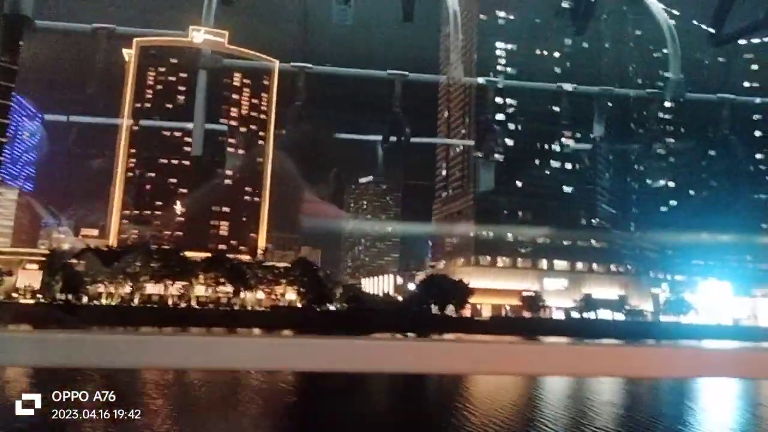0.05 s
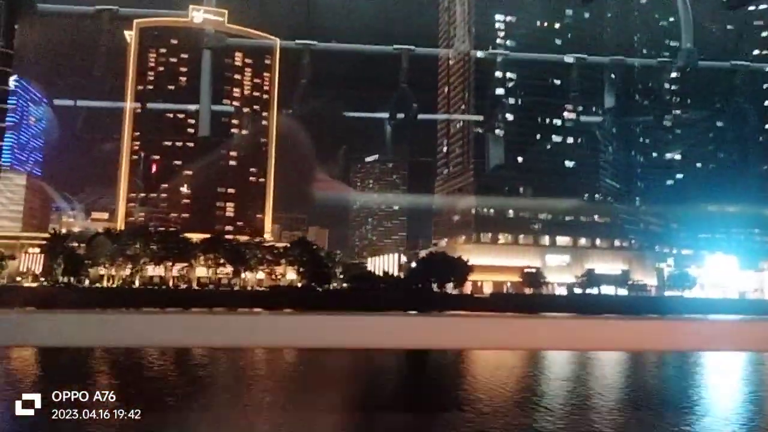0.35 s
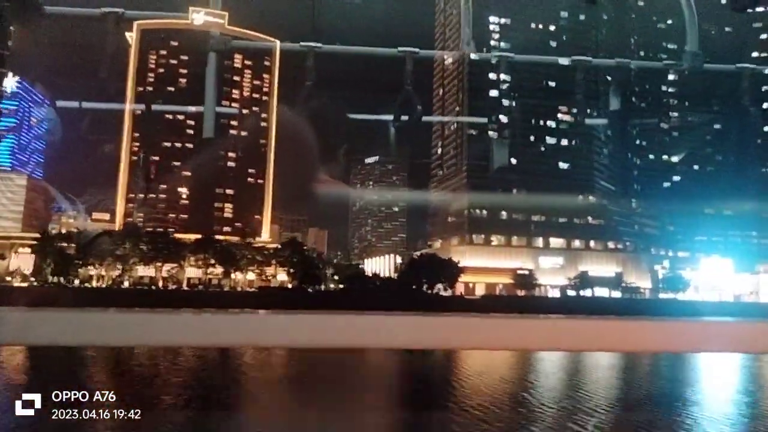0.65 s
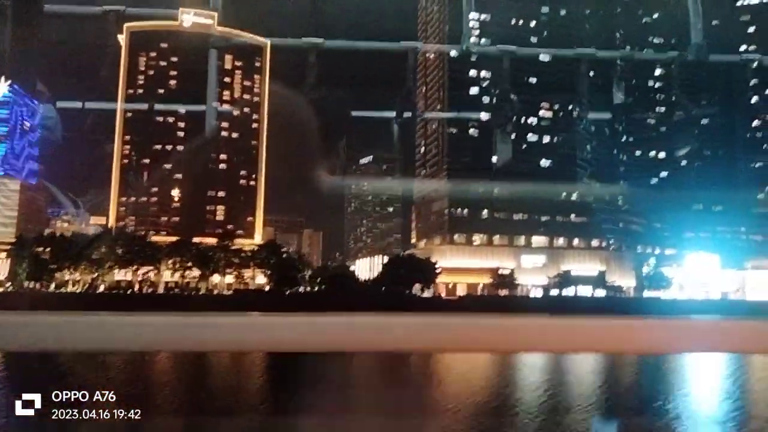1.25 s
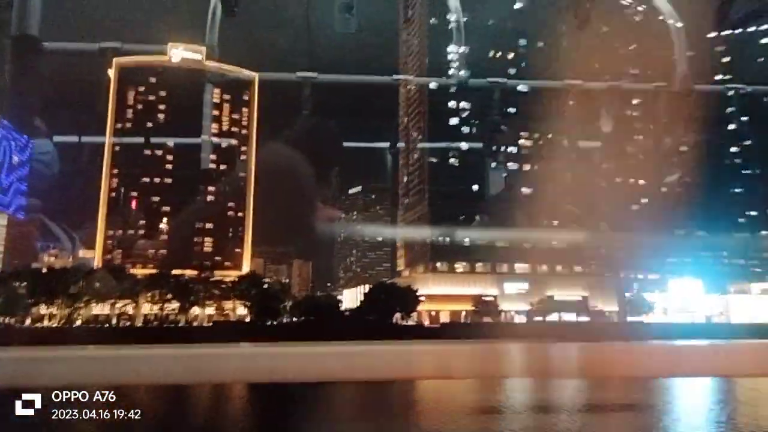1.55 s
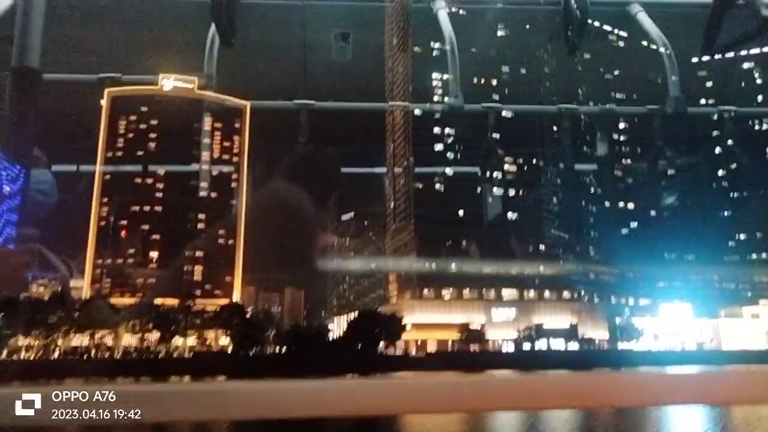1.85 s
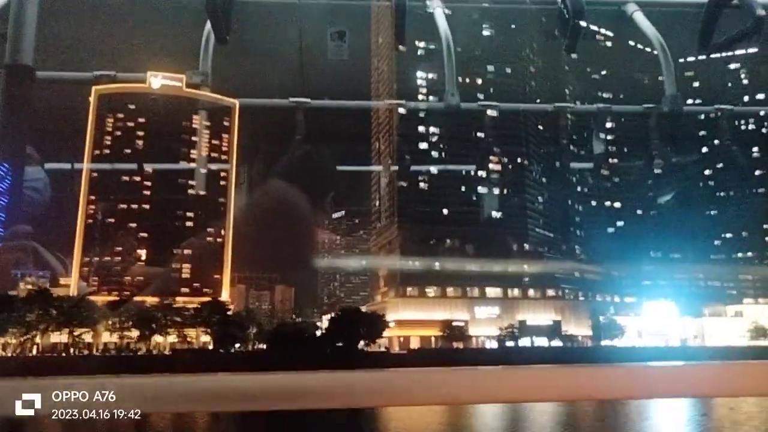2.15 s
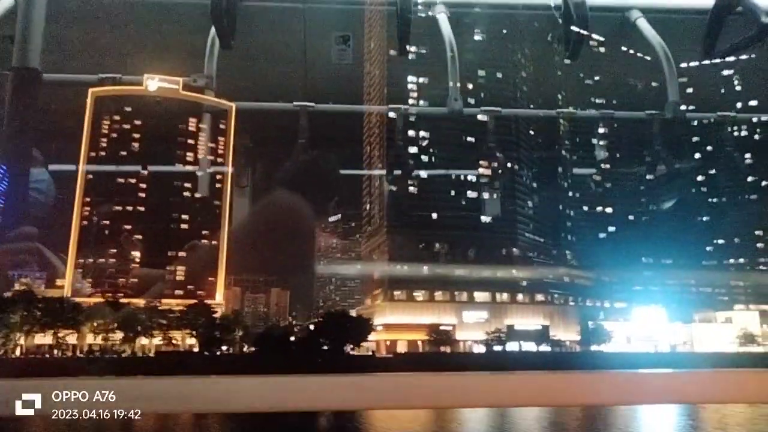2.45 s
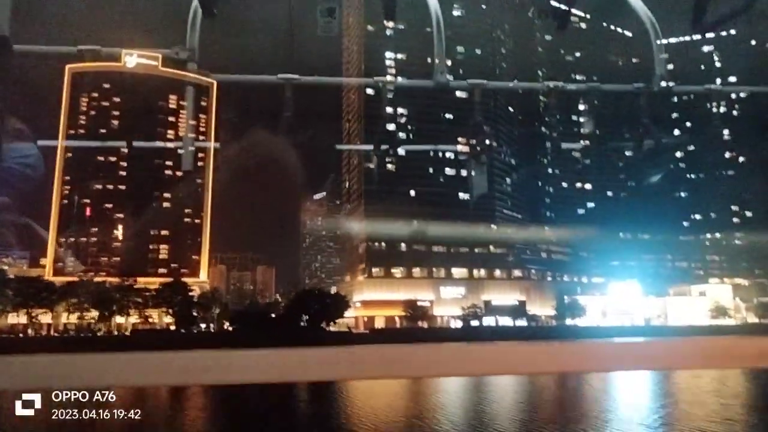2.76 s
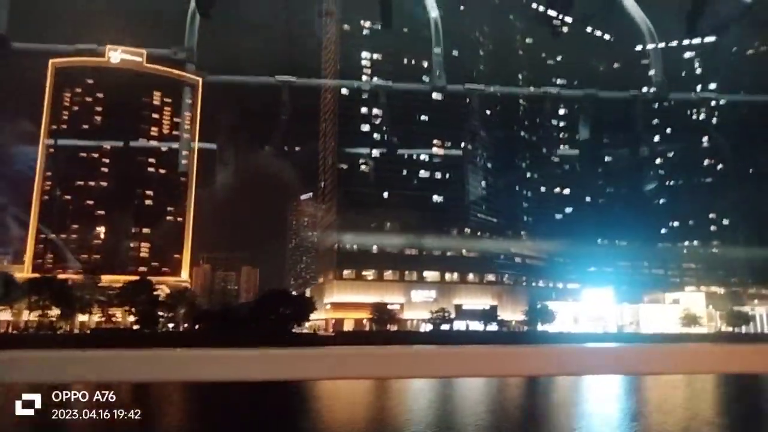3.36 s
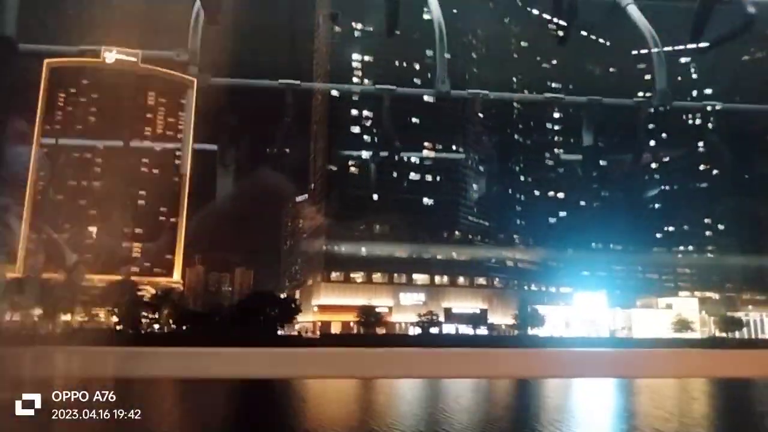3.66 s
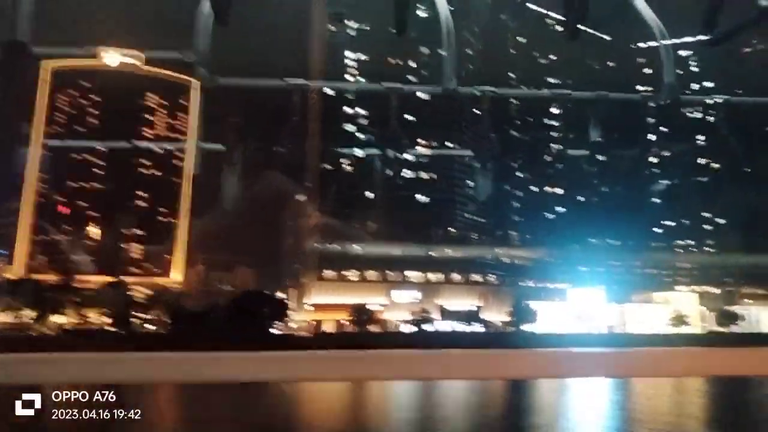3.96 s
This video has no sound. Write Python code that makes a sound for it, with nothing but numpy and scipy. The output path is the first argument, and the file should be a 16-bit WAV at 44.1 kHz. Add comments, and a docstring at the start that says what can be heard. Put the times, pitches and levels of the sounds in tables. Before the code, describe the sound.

Inside a moving bus, the engine hums low and steady over road noise, a thin whine and faint nearby rustling. A short air brake blast cuts in, the engine eases, and near the end the body booms and creaks.

```python
"""A six-cylinder diesel drones inside a moving bus, with a gear whine over the road rumble.
Drone and whine are multiples of the crankshaft's rate and soften as the driver lifts off the throttle.
An air brake valve blows off once, a turbulent jet through a resonant pipe, and goes on leaking faintly.
Something rustles softly nearby and loose fittings rattle. Near the end a bump makes the body boom
at its low resonance, and a panel creaks as the body flexes back."""
import sys
import numpy as np
from scipy.fft import rfft, irfft, next_fast_len
from scipy.io import wavfile
from scipy.ndimage import map_coordinates

SR = 44100
rng = np.random.default_rng(int(sys.argv[2]) if len(sys.argv) > 2 else 0)


def dump(signal):
    """Clip the signal to [-1, 1] and save it as 16-bit WAV at the path in sys.argv[1]."""
    limited = np.clip(np.atleast_2d(signal).T, -1, 1)
    pcm = np.round(limited * 32767).astype(np.int16)
    wavfile.write(sys.argv[1], SR, pcm)


N = 176400


def amp(db):
    """Amplitude ratio of a level in decibels."""
    return 10 ** (np.asarray(db) / 20)


def unit(x):
    """Normalisation to rms 1."""
    return x / np.sqrt(np.mean(x ** 2) + 1e-20)


def clock():
    """Time of every sample, in seconds."""
    return np.arange(N) / SR


def along(points, hz):
    """Interpolation of (frequency_hz, value) points on a logarithmic axis."""
    frequencies, values = np.transpose(points)
    return np.interp(np.log(hz + 1), np.log(frequencies + 1), values)


def curve(rows):
    """Linear interpolation of (time_s, value) points at every sample."""
    return np.interp(clock(), *np.transpose(rows))


def wobble(rate_hz):
    """Smooth random modulation: a spline through rate_hz Gaussian values a second."""
    return map_coordinates(rng.standard_normal(4000), [clock() * rate_hz + 2], mode="wrap")


def filtered(x, response):
    """Linear filtering: the spectrum is multiplied by a frequency response."""
    size = next_fast_len(N + 8192)
    return irfft(rfft(x, size) * response(np.fft.rfftfreq(size, 1 / SR)), size)[..., :N]


def lowpass(x, cutoff_hz, slope):
    """Low-pass filtering: above the cutoff, gain falls as frequency to the power -slope."""
    return filtered(x, lambda hz: 1 / (1 + (hz / cutoff_hz) ** slope))


def pan(db):
    """Stereo gains for a level difference, left minus right."""
    return amp(np.array([[db], [-db]]) / 2)


def swell(peak_s, rise_s, fall_s):
    """Envelope with a Gaussian rise to 1 and an exponential decay."""
    t = clock() - peak_s
    return np.exp(-np.where(t < 0, (t / rise_s) ** 2, t / fall_s))


# Left-right likeness of the cabin sound: frequency_hz, correlation
CABIN_CORRELATION = [(60, .98), (120, 0.99), (240, .9), (400, 0.64), (700, 0.55), (1000, -0.021),
                     (1450, -0.61), (1850, 0.15), (3500, -0.091), (15000, 0.036)]

def stereo_angle(hz):
    """Half the phase difference whose cosine is the left-right correlation."""
    return np.arccos(np.clip(along(CABIN_CORRELATION, hz), -1, 1)) / 2


def tone(phase, hz):
    """A stereo sine of rms 1 that reaches the two microphones out of phase."""
    offset = stereo_angle(hz)
    return np.sqrt(2) * np.sin(phase + rng.uniform(0, 2 * np.pi) + np.array([[offset], [-offset]]))


def noise(gain):
    """A partly coherent noise field of rms 1: alike in the bass, unrelated in the high treble."""
    weights = lambda hz: np.array([np.cos(stereo_angle(hz)), np.sin(stereo_angle(hz))])
    mid, side = filtered(rng.standard_normal((2, N)), lambda hz: gain(hz) * weights(hz))
    return unit(np.array([mid + side, mid - side]))


def shaped(spectrum):
    """Spectral shaping of cabin noise by (frequency_hz, relative_db) points."""
    return noise(lambda hz: amp(along(spectrum, hz)))


# Crankshaft speed: time_s, speed_hz
CRANK_SPEED = [(0, 20.11), (0.5, 20.43), (1, 20.58), (1.5, 20.77), (2, 21.04), (2.4, 21.14), (2.8, 20.95),
               (3.3, 20.79), (4, 20.53)]
# Throttle, 0 to 1: time_s, load_fraction
THROTTLE = [(0, 0.98), (.7, 1), (2.55, 0.93), (2.8, 0.44), (3.7, 0.3), (3.9, 0.6)]
# Strong engine orders: cycles_per_two_turns
STRONG_HARMONICS = [5, 6, 10, 12, 15, 19, 20, 22]
# Their levels, row for row: loaded_db, coasting_db
STRONG_LEVELS = [(-27.5, -23.5), (-17.5, -31.5), (-19.5, -18.5), (-27, -33.5), (-33.5, -31.5),
                 (-23.5, -35.5), (-28.5, -29), (-33, -33)]
# Envelope of the weaker orders at full load: frequency_hz, level_db
WEAK_LEVELS = [(30, -42), (45, -43), (80, -28.5), (115, -48.5), (160, -36), (230, -38.5), (330, -42),
               (450, -48), (900, -59)]
# Extra gain of the fifth order, the body drone near 104 Hz: time_s, gain_db
DRONE_GAIN = [(0, 4.5), (.3, -14), (.65, 0.5), (4, 0.5)]
DRONE_HARMONIC, WEAK_COAST_DB = 10, -3
WAVER_DB, WAVER_FROM_HZ = 0.99, 91  # higher orders waver more as the panels shake

def engine(crank_phase, mean_crank_hz):
    """Harmonic series: the firing cycle repeats every two turns, so its partials are half orders."""
    load = curve(THROTTLE)
    strong = dict(zip(STRONG_HARMONICS, STRONG_LEVELS))
    drone = 0
    for harmonic in range(3, 46):
        hz = harmonic / 2 * mean_crank_hz
        if harmonic in strong:
            loaded_db, coasting_db = strong[harmonic]
            waver_db = WAVER_DB * max(1, hz / WAVER_FROM_HZ) * wobble(6.975)
            db = coasting_db + load * (loaded_db - coasting_db) + waver_db
        else:
            db = along(WEAK_LEVELS, hz) + WEAK_COAST_DB * (1 - load) + 3 * wobble(5.04)
        if harmonic == DRONE_HARMONIC:
            db = db + curve(DRONE_GAIN)
        drone = drone + amp(db) * tone(harmonic / 2 * crank_phase, hz)
    return drone


# Pure tone of the gear mesh: time_s, level_db
MESH_LEVEL = [(0, -29.5), (.5, -28.5), (1.1, -30.5), (1.45, -33.5), (1.7, -30.5), (2.1, -36), (2.55, -37),
              (2.8, -38), (3.4, -40), (4, -38)]
MESHES_PER_TURN, SIDEBAND_DB = 31.25, -41.5
SKIRT_DB, SKIRT_COAST_DB, SKIRT_HALF_WIDTH_HZ = -35, 3, 28

def gear_whine(crank_phase, mean_crank_hz):
    """Gear meshing: a tone at the tooth rate, a modulation skirt and a sideband one firing rate below."""
    phase, hz = MESHES_PER_TURN * crank_phase, MESHES_PER_TURN * mean_crank_hz
    line = amp(curve(MESH_LEVEL) + 0.77 * wobble(6.47)) * tone(phase, hz)
    skirt = sum(wobble(SKIRT_HALF_WIDTH_HZ * 2) * tone(phase, hz) for _ in range(4)) / 2
    skirt_db = SKIRT_DB + SKIRT_COAST_DB * (0.5 - curve(THROTTLE))
    sideband = wobble(12) * tone(phase - 3 * crank_phase, hz)  # three firings a turn
    return pan(db=-3.5) * (line + amp(skirt_db) * skirt + amp(SIDEBAND_DB) * sideband)


# Road and cabin noise: frequency_hz, relative_db
ROAD_SPECTRUM = [(10, -30), (18, -20.5), (26, 1), (42, -8.5), (78, -3), (112, -9.5), (160, -9.5),
                 (185, -11), (225, -8.5), (280, -21), (500, -21), (700, -21), (830, -20.5), (1050, -27),
                 (1400, -28.5), (1600, -34.5), (2000, -36.5), (2800, -40.5), (4000, -48), (5000, -52),
                 (6000, -56.5), (9000, -61.5), (15500, -67.5)]
ROAD_DB, RUMBLE_WAVER_DB, CLATTER_DEPTH = -20.5, 1.7, 0.052

def road_rumble(crank_phase):
    """Broadband tyre and body noise; its upper band is amplitude-modulated twice per crank turn."""
    rush = shaped(ROAD_SPECTRUM)
    low = lowpass(rush, cutoff_hz=450, slope=4)
    clatter = 1 + CLATTER_DEPTH * np.sin(2 * crank_phase + wobble(8.22))
    rumble = low * amp(RUMBLE_WAVER_DB * wobble(1.7))
    hiss = (rush - low) * clatter * amp(0.9 * wobble(12))
    return amp(ROAD_DB) * (rumble + hiss)


# Soft swishes close by: peak_s, level_db
RUSTLE_STROKES = [(.03, -49), (.24, -49), (.34, -50), (.39, -50.5), (.445, -46.5), (.492, -43.5),
                  (.535, -51.5), (0.714, -54), (.888, -51), (1.22, -53), (1.565, -52), (1.62, -47),
                  (1.68, -63), (1.8, -53), (1.88, -47.5), (2.95, -48), (3.62, -50), (3.68, -48.5),
                  (3.905, -48), (3.99, -40)]
# Their noise: frequency_hz, relative_db
RUSTLE_SPECTRUM = [(1500, -17), (3500, 6.5), (7000, -2.5), (9500, -5.5), (12500, -2.5), (15500, -7)]
GRAIN_DB = 2

def rustles():
    """Incoherent addition: strokes of grainy noise sum in power."""
    power = sum((amp(db) * swell(peak_s, rise_s=0.0065, fall_s=0.042)) ** 2
                for peak_s, db in RUSTLE_STROKES)
    grain = amp(GRAIN_DB * wobble(600))
    return np.sqrt(power) * unit(grain * shaped(RUSTLE_SPECTRUM))


# Rattles of the fittings: peak_s, level_db, centre_hz
FITTING_RATTLES = [(.215, -53, 5160), (.367, -49.5, 5160), (.41, -44, 2670), (0.479, -42.5, 1970),
                   (1.17, -53, 6000), (3.592, -45.5, 4550), (3.657, -32, 1230), (3.66, -40, 2290),
                   (3.875, -51, 5700)]
RATTLE_HALF_WIDTH_OCTAVES = 0.29

def rattles():
    """Damped vibration: loose fittings chatter briefly, each in its own band of noise."""
    def band(centre_hz):
        return noise(lambda hz: 1 / (1 + (np.log2((hz + 1) / centre_hz) / RATTLE_HALF_WIDTH_OCTAVES) ** 2))
    chatter = amp(3.3 * wobble(250))
    return chatter * sum(amp(db) * swell(peak_s, rise_s=0.0017, fall_s=0.038) * band(hz)
                         for peak_s, db, hz in FITTING_RATTLES)


# Air jet at the valve: frequency_hz, relative_db
JET_SPECTRUM = [(200, -33), (600, -11), (1200, -3.5), (1550, -7.5), (2000, -4.5), (3000, -9.5),
                (4500, -10.5), (6000, -15.5), (9000, -20), (12000, -20.5), (15500, -27)]
# Pipe resonances: centre_hz
PIPE_MODES = [1243, 1880, 2117, 2578, 3120, 4076, 4666]
# Their peaks, row for row: bandwidth_hz, gain_db
PIPE_PEAKS = [(24, 4.5), (60, 4), (24, 10), (36, 8), (78, 7.1), (45, 8), (36, 8.5)]
BLAST_START_S, BLAST_DB, ATTACK_S, HOLD_S = 2.026, -17.5, 0.023, 0.046

def air_brake():
    """Source and filter: a turbulent jet excites pipe resonances as the valve opens, holds and empties."""
    def pipe(hz):
        return 1 + sum((amp(db) - 1) / (1 + (2 * (hz - centre) / width) ** 2)
                       for centre, (width, db) in zip(PIPE_MODES, PIPE_PEAKS))
    def flow(lag_s, fall_db_per_s):
        t = clock() - BLAST_START_S - lag_s
        opening = np.clip(t / ATTACK_S, 0, 1) ** 1.06
        return opening * amp(-fall_db_per_s * np.maximum(t - ATTACK_S - HOLD_S, 0))
    jet = noise(lambda hz: amp(along(JET_SPECTRUM, hz)) * pipe(hz))
    dull = lowpass(jet, cutoff_hz=5460, slope=6)
    low = lowpass(jet, cutoff_hz=1600, slope=8)
    body = low * flow(lag_s=0.017, fall_db_per_s=81)  # builds up in the cabin and lingers
    middle = (dull - low) * flow(lag_s=0, fall_db_per_s=105)
    treble = (jet - dull) * flow(lag_s=0.01, fall_db_per_s=146)
    return amp(BLAST_DB + 1.3 * wobble(120)) * (body + middle + treble)


# Fizz of the last air leaving the valve: frequency_hz, relative_db
FIZZ_SPECTRUM = [(3000, -18), (7300, -7), (9200, -8), (13000, -2), (15500, -10)]
# Lasting hiss of the leak: frequency_hz, relative_db
LEAK_SPECTRUM = [(1500, -28), (3000, -4.5), (4800, 5.5), (5400, -0.5), (6000, -7.5), (7800, -0.5),
                 (9200, -8), (12500, -3.5), (15500, -11)]
FIZZ_DB, FIZZ_FALL_DB_PER_S = -37.5, 34.5
LEAK_DB, LEAK_EXTRA_DB, LEAK_SETTLE_S = -51, 14, 0.12

def valve_leak():
    """Turbulence of escaping air: a fizz decays exponentially while a thin hiss settles and stays."""
    t = np.maximum(clock() - BLAST_START_S, 0)
    hiss_db = LEAK_DB + LEAK_EXTRA_DB * np.exp(-t / LEAK_SETTLE_S) + 0.6 * wobble(5.4)
    fizz = amp(FIZZ_DB - FIZZ_FALL_DB_PER_S * t) * shaped(FIZZ_SPECTRUM)
    hiss = pan(db=0.5) * amp(hiss_db) * shaped(LEAK_SPECTRUM)
    opening = np.clip(t / ATTACK_S, 0, 1) ** 2
    return opening * (hiss + fizz)


BOOM_HZ, BOOM_DB = 75.7, -9

def body_boom():
    """Resonance: a bump excites a low mode of the body, which swells and stops quickly."""
    phase = 2 * np.pi * BOOM_HZ * clock() + 0.1 * wobble(20)
    return amp(BOOM_DB) * swell(peak_s=3.625, rise_s=0.12, fall_s=0.012) * tone(phase, BOOM_HZ)


CREAK_HZ, CREAK_HALF_WIDTH_HZ, CREAK_DB = 2400, 190, -43.5

def panel_creak():
    """Narrow-band noise: a panel gives a short, rough note as the body flexes back."""
    ring = noise(lambda hz: 1 / (1 + ((hz - CREAK_HZ) / CREAK_HALF_WIDTH_HZ) ** 2))
    return amp(CREAK_DB) * swell(peak_s=3.72, rise_s=0.073, fall_s=0.041) * ring


def scene():
    """Superposition: one crankshaft times drone, whine and clatter; air and small noises add to them."""
    crank_hz = curve(CRANK_SPEED) * (1 + 0.00061 * wobble(10))  # slight speed jitter
    phase, mean_hz = 2 * np.pi * np.cumsum(crank_hz) / SR, crank_hz.mean()
    driving = engine(phase, mean_hz) + gear_whine(phase, mean_hz) + road_rumble(phase)
    return driving + rustles() + rattles() + air_brake() + valve_leak() + body_boom() + panel_creak()


# Microphone balance: frequency_hz, left_minus_right_db
MIC_BALANCE = [(60, 0.8), (250, 1.4), (500, 0), (1000, 1.9), (2400, -2.5), (6000, 0.5), (15000, -2.5)]
PEAK_LIMIT, TOP_HZ = 0.95, 15780

def record(dry):
    """Transduction by two slightly unequal microphones, with soft saturation and a band limit."""
    balanced = filtered(dry, lambda hz: amp(np.array([[0.5], [-0.5]]) * along(MIC_BALANCE, hz)))
    rounded = balanced / (1 + np.abs(balanced / PEAK_LIMIT) ** 8) ** (1 / 8)
    return filtered(rounded, lambda hz: hz < TOP_HZ)


dry = scene()
out = record(dry)
dump(out)
```